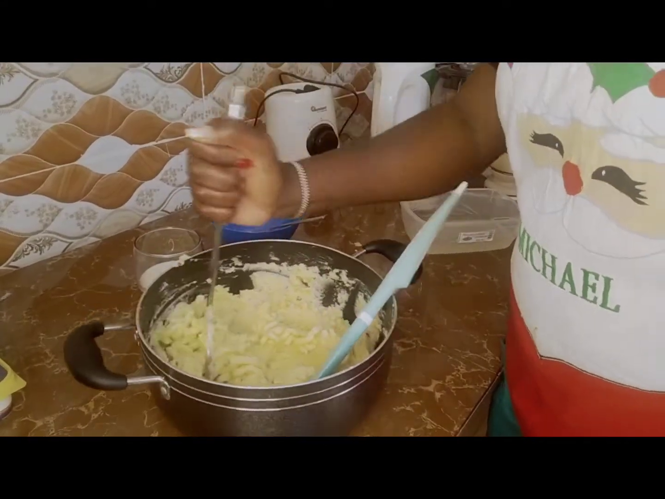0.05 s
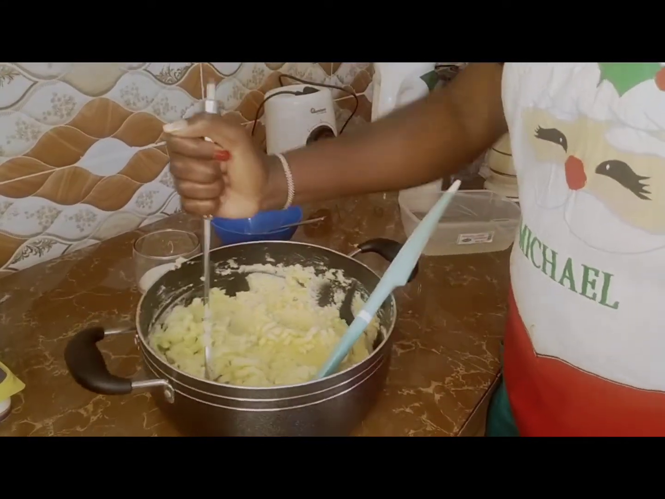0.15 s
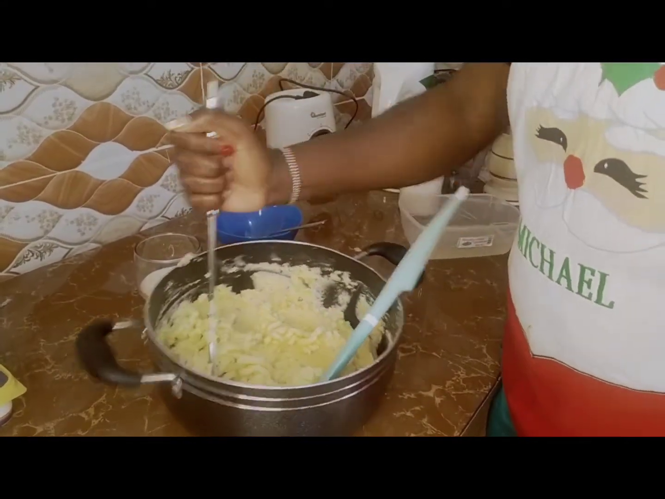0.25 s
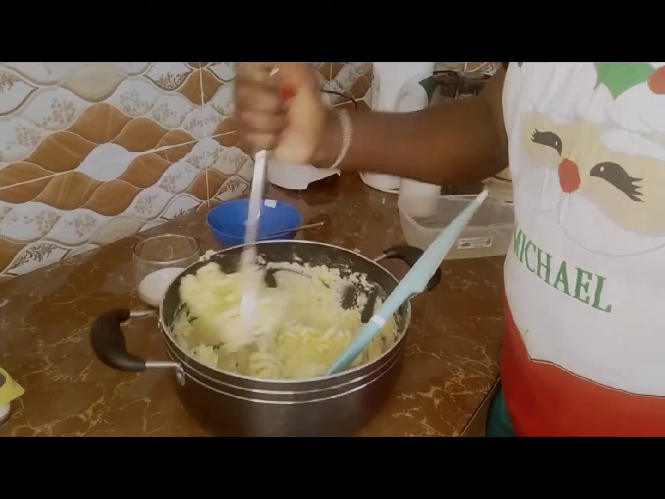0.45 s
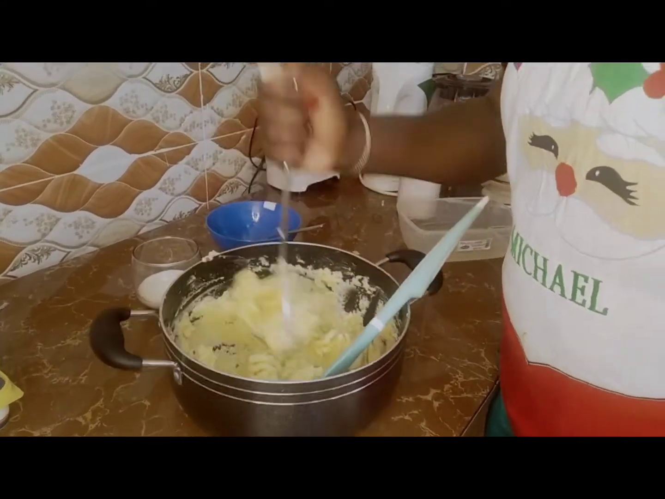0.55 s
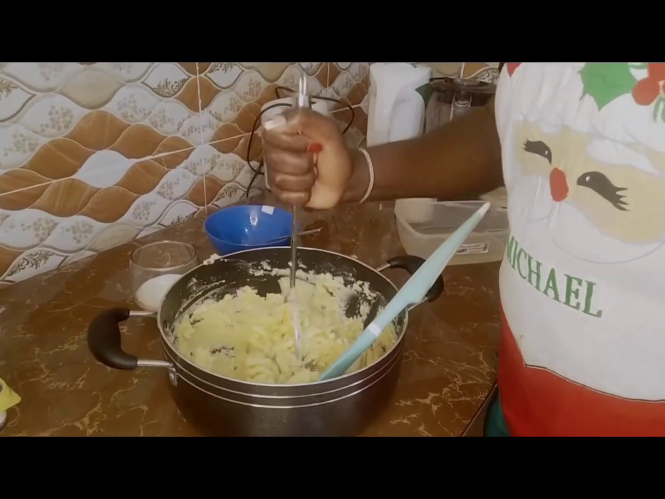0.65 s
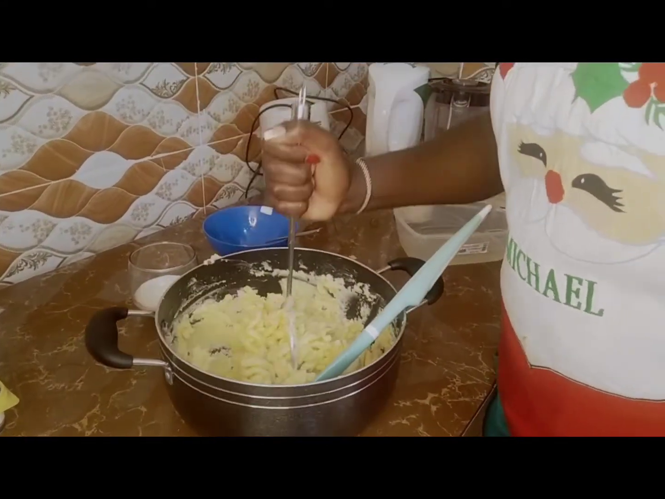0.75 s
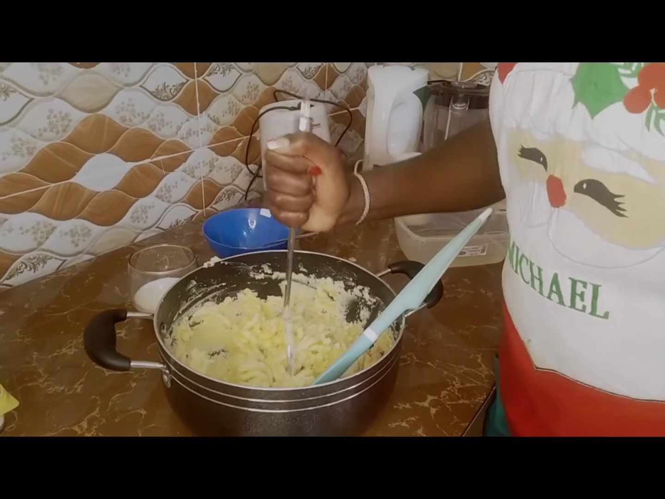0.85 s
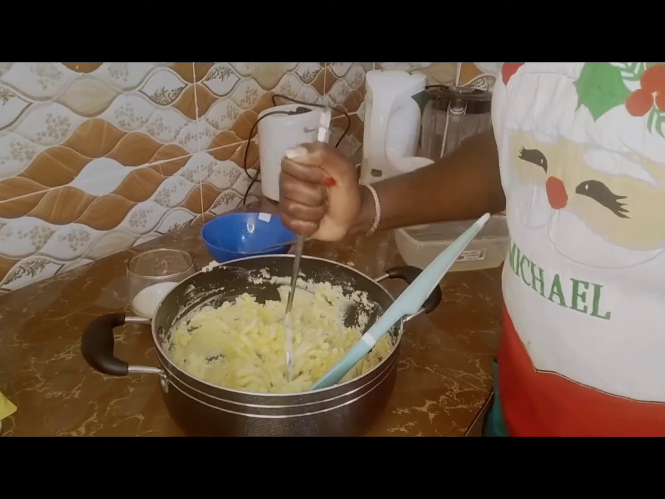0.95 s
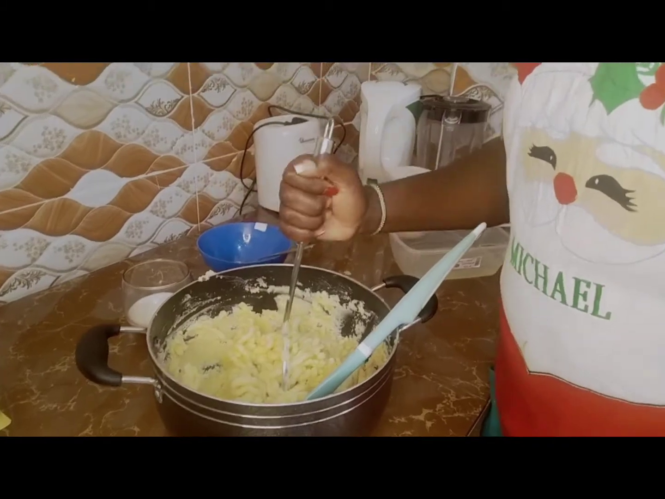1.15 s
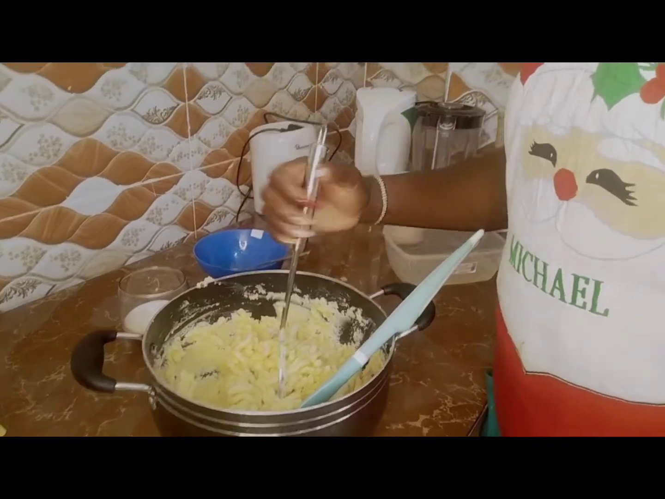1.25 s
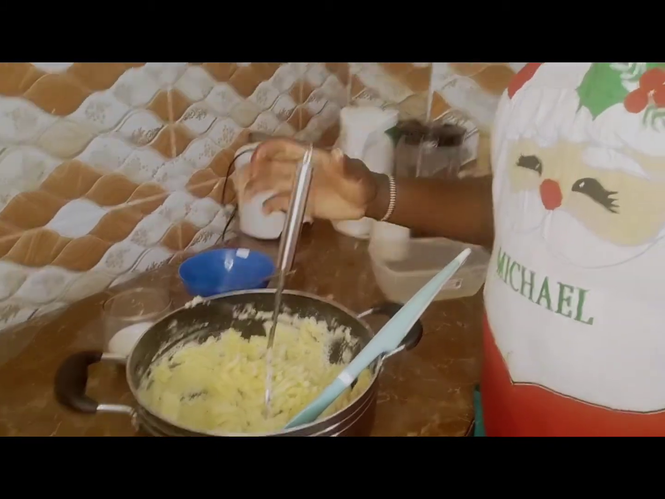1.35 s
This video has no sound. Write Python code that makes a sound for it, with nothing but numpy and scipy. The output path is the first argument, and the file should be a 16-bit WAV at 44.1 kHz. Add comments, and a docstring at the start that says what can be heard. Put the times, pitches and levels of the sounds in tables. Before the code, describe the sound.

Masher striking a metal pot with a clack and thud, followed by faint clicks and scraping.

```python
"""A tiled kitchen, one microphone within earshot of a metal pot on the counter.
A steel masher comes down through boiled potato: it knocks lightly, lands with a clack and a thud,
then clicks and scrapes over the bottom. Each contact rings the steel, and the weight of a stroke
sets pot and counter booming, damped by the mash. The tiles ring briefly; an appliance hums behind."""
import sys
import numpy as np
from scipy import signal
from scipy.fft import rfft, irfft, next_fast_len
from scipy.io import wavfile
from scipy.ndimage import map_coordinates

SR = 44100
rng = np.random.default_rng(int(sys.argv[2]) if len(sys.argv) > 2 else 0)


def wrap_up_sound(samples):
    """Save the sound to the file named by the first command line argument, as 16-bit audio."""
    columns = np.atleast_2d(samples).T
    # keep every value between -1 and 1, then stretch to whole-number steps
    tamed = np.clip(columns, -1, 1)
    steps = np.round(tamed * 32767).astype(np.int16)
    wavfile.write(sys.argv[1], SR, steps)


N = 61739

# Steel meeting the pot. Each row: start in seconds, level in dB, contact length in seconds, tilt in
# dB per octave, top treble in dB, ring in dB, ring length as a multiple of the free ring.
CONTACTS = [(.2000, -44, 0.0039, -3, -5, 8.5, 0.46), (0.226, -45, 0.0022, -5.5, 7, -6, 0.5),
            (.3362, -31.5, 0.0027, 3.5, -10, 9, 1), (.3420, -25.5, 0.0015, 0, -6, 2.5, 0.74),
            (0.344, -23.5, 0.0027, 0, 0, -18, 0.23), (0.401, -34.5, 0.0043, -2, 0, 1, 0.55),
            (0.618, -53, 0.0027, 2, -2, -17, 0.44), (.8290, -38, 0.0027, 0.3, 7, 4, 1.15),
            (0.835, -40, 0.0026, -1, -8, -9, 0.72), (0.8378, -45, 0.011, -1.5, 3, 5, 1),
            (.8475, -52, 0.0014, 3, -2, 7, 1.2), (0.8727, -42.5, 0.0019, 3.5, 7, 2, 1.1),
            (.8960, -44.5, 0.0036, 4, 0, -5, 1.2), (0.9024, -43.5, .005, 2, 5.5, 4, 1.6),
            (0.984, -50, 0.014, 0, 6, -8, 0.76), (1.0538, -46.5, 0.0017, 4.5, -14, -20, .5)]
# The steel's free ring. Each row: frequency in Hz, level in dB, seconds to fall 60 dB (t60).
STEEL_MODES = [(1004, -12, 0.043), (1967, -17, 0.15), (2153, -16.5, .1), (2324, -2.5, 0.021),
               (2400, -37, 0.098), (3493, -15, 0.052), (3828, -18.5, .07), (6660, -13, .03),
               (8800, -23.5, 0.026)]
# A stroke's weight on the pot, or the soft pull as the masher lifts out of the mash. Each row: start in
# seconds, level in dB, boom tilt in dB per octave, # dull push in dB, push length in seconds, hollow knock in
# dB.
STROKES = [(.2020, -45, 1, 5, 0.036, -3), (0.3459, -20, -3, 0.5, 0.0049, 3),
           (0.409, -31.5, -9, 2, 0.011, -1.5), (0.571, -49.5, -6, 0.5, 0.037, -13)]
# The loaded pot on the counter. Each row: frequency in Hz, level in dB, t60 in seconds.
POT_MODES = [(62, -18, .9), (112.3, -10, 0.61), (128.2, 8, 0.16), (160.6, -9, 0.74), (226.9, 0, .28),
             (266, -40, 0.36), (316.7, -10.5, 0.69), (397, -26, 0.16), (512, -11, 0.49), (551.6, -12, 0.51),
             (627, -6, 0.38), (705, -9, 0.23), (764, -14, 0.44), (1010, -17, 0.19), (1193, -17, 0.41),
             (1482, -14, 0.23)]
# The tone of each noise. Each row: frequency in Hz, relative level in dB.
CONTACT_TONE = [(200, -36), (600, -12.5), (1050, 2.5), (1650, 7), (2350, 5), (2900, 2), (3600, 2.5),
                (4800, -2.5), (6800, 1), (8500, 3), (10700, -14.5), (15000, -10)]  # steel grating on the pot
PUSH_TONE = [(25, -30), (70, -20), (120, 0), (260, 2), (450, -5), (800, -15.5), (1400, -21.5),
             (2500, -34.5), (6000, -60)]  # shoved mash
KNOCK_TONE = [(300, -3.5), (620, -4), (860, -7.5), (1100, 0.5), (1400, -5.5), (1750, -15), (4000, -36)]  # the pot's wall
SLIP_TONE = [(300, -44), (1000, 4.5), (2200, -2), (4500, -7.5), (8300, 2.5), (10500, -7.5), (15000, -16)]  # steel on the wet bottom
TILE_TONE = [(60, 3.5), (300, 1), (1300, -2), (3000, 1.5), (8000, -0.5), (14000, 1.5)]  # the tail off the walls
AIR_TONE = [(25, -63.5), (70, -62.5), (200, -73.5), (600, -75), (1200, -78.5), (2700, -85), (4500, -96.5),
            (6500, -97.5), (8300, -92), (10000, -99), (15000, -100)]  # room tone
# The kitchen's decay. Each row: frequency in Hz, t60 in seconds.
TILE_DECAY = [(100, 1), (300, 0.49), (1000, 0.71), (3000, 0.5), (8000, 0.32), (15000, .25)]
# The appliance's hum. Each row: frequency in Hz, rms level at the microphone in dB.
HUM_PARTIALS = [(66, -60), (127, -49), (251, -70.5), (379, -69.5), (495, -86), (544.5, -63.5)]


def masher_clicks():
    """Each contact grates for milliseconds and rings the steel, more briefly when the mash grips it."""
    out, t = np.zeros(N), np.arange(N) / SR
    top_treble_hz = 9600
    for start, db, length, tilt, top_db, ring_db, ring_scale in CONTACTS:
        tone = [(hz, level + top_db * (hz > top_treble_hz)) for hz, level in CONTACT_TONE]
        grate = coloured(rng.standard_normal(N) * fade(t - length, t60=0.01), tone, tilt)
        ring = struck([(hz, level, t60 * ring_scale) for hz, level, t60 in STEEL_MODES], t)
        click = in_kitchen(grate, wet_db=-6) + amp(ring_db) * in_kitchen(ring, wet_db=-10.5)
        add(out, start, amp(db) * click)
    return out


def pot_thuds():
    """A stroke, or the masher lifting out, shoves the mash, knocks the pot's wall and sets pot and counter
    booming."""
    out, t = np.zeros(N), np.arange(N) / SR
    attack_s, pivot_hz = 0.0016, POT_MODES[1][0]
    attack = 1 - np.exp(-t / attack_s)
    for start, db, tilt, push_db, push_s, knock_db in STROKES:
        modes = [(hz, level + tilt * np.log2(hz / pivot_hz), t60) for hz, level, t60 in POT_MODES]
        boom = struck(modes, t)
        push = amp(push_db + 0.5) * noise(PUSH_TONE) * fade(t - push_s, t60=0.083)
        knock = amp(knock_db) * coloured(rng.standard_normal(N) * fade(t, t60=0.032), KNOCK_TONE)
        body = attack * (boom + in_kitchen(push, wet_db=-5.5))
        add(out, start, amp(db) * (body + in_kitchen(knock, wet_db=-10.5)))
    return out


def masher_scrape():
    """Dragged over the wet bottom of the pot, the steel moves in tiny slips."""
    out, t = np.zeros(N), np.arange(N) / SR
    start_s, hold_s = 0.832, 0.1
    slips_per_s, scatter_db = 4000, 3
    slips = (rng.random(N) < slips_per_s / SR) * rng.standard_normal(N)
    slips *= amp(scatter_db * rng.standard_normal(N))
    scrape = unit(coloured(slips, SLIP_TONE)) * fade(t - hold_s, t60=0.23)
    add(out, start_s, amp(-56.5) * scrape)
    return in_kitchen(out, wet_db=0)


def in_kitchen(x, wet_db):
    """The microphone hears the direct sound plus a diffuse tail off the tiled walls."""
    build_s = 0.004
    hz, t, spectrum = signal.stft(rng.standard_normal(N), SR, nperseg=256)
    envelope = fade(t, along(TILE_DECAY, hz)[:, None]) * (1 - np.exp(-t / build_s))
    tail = signal.istft(spectrum * envelope, SR, nperseg=256)[1]
    tail = coloured(tail / np.linalg.norm(tail), TILE_TONE)
    return x + amp(wet_db) * signal.fftconvolve(x, tail)[:N]


def appliance_hum():
    """An appliance hums in the background, each partial slightly unsteady in level and phase."""
    hum, t = np.zeros(N), np.arange(N) / SR
    waver_db, waver_rad = 0.6, 0.1
    for hz, db in HUM_PARTIALS:
        peak = np.sqrt(2) * amp(db + waver_db * wobble(8.7))
        phase = 2 * np.pi * (hz * t + rng.random()) + waver_rad * wobble(14.5)
        hum += peak * np.sin(phase)
    return hum


def struck(modes, t):
    """Struck modes ring as dying sines, their levels a little different at every hit."""
    return sum(amp(db + rng.normal(0, 1)) * fade(t, t60) * np.sin(2 * np.pi * hz * t)
               for hz, db, t60 in modes)


def noise(tone):
    """Steady noise of this tone at rms 1."""
    return unit(coloured(rng.standard_normal(N), tone))


def coloured(x, tone, tilt=0):
    """Causal filter of this tone, tilted in dB per octave above 500 Hz; keeps white noise's power."""
    size = 2 * next_fast_len(N)
    hz = np.fft.rfftfreq(size, 1 / SR)
    gain = unit(amp(along(tone, hz) + tilt * np.log2(1 + hz / 500)))
    cepstrum = irfft(np.log(gain), size)
    cepstrum[1:size // 2] *= 2  # fold to minimum phase: nothing sounds ahead of a hit
    cepstrum[size // 2 + 1:] = 0
    return irfft(rfft(x, size) * np.exp(rfft(cepstrum)), size)[:N]


def along(points, hz):
    """Interpolate (Hz, value) points on a log frequency axis."""
    freqs, values = np.transpose(points)
    return np.interp(np.log(hz + 1), np.log(freqs + 1), values)


def amp(db):
    """Decibels to gain."""
    return 10 ** (np.asarray(db) / 20)


def unit(x):
    """Scale to rms 1."""
    return x / np.sqrt(np.mean(x ** 2) + 1e-20)


def fade(t, t60):
    """Hold at 1 until t = 0, then fall 60 dB every t60 seconds."""
    return np.exp(-np.log(1000) * np.maximum(t, 0) / t60)


def wobble(knots_per_s):
    """A smooth random curve."""
    return map_coordinates(rng.standard_normal(64), [np.arange(N) * knots_per_s / SR], mode="wrap")


def add(track, start_s, sound):
    """Mix a sound in from start_s."""
    i = round(start_s * SR)
    track[i:] += sound[:N - i]


def scene():
    """Masher and pot over hum and room tone, all at one microphone."""
    mashing = masher_clicks() + pot_thuds() + masher_scrape()
    background = appliance_hum() + amp(-55) * noise(AIR_TONE)
    return (mashing + background)[None]


def record(dry):
    """The microphone's signal is cut off above the band limit."""
    size, top_hz = 2 * next_fast_len(N), 15800
    passband = np.fft.rfftfreq(size, 1 / SR) < top_hz
    return irfft(rfft(dry, size) * passband, size)[:, :N]


dry = scene()
out = record(dry)
wrap_up_sound(out)
```